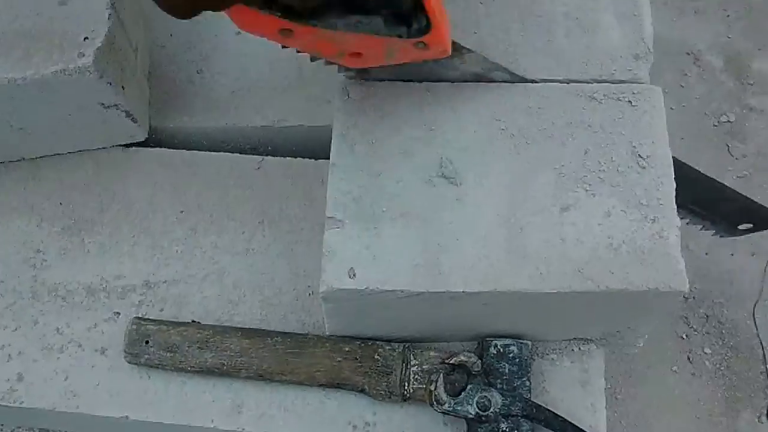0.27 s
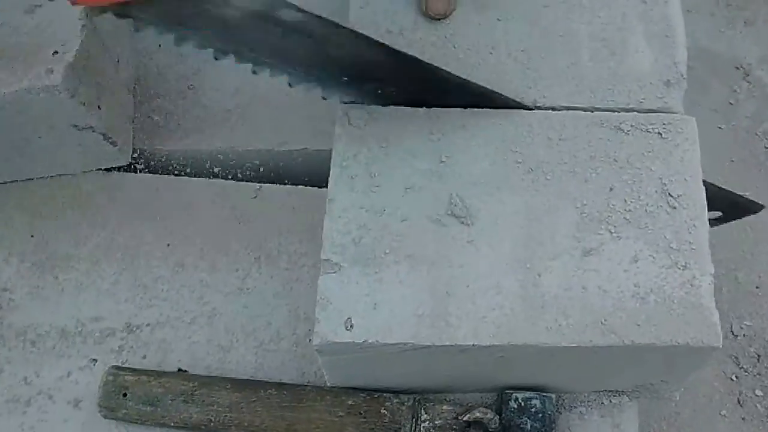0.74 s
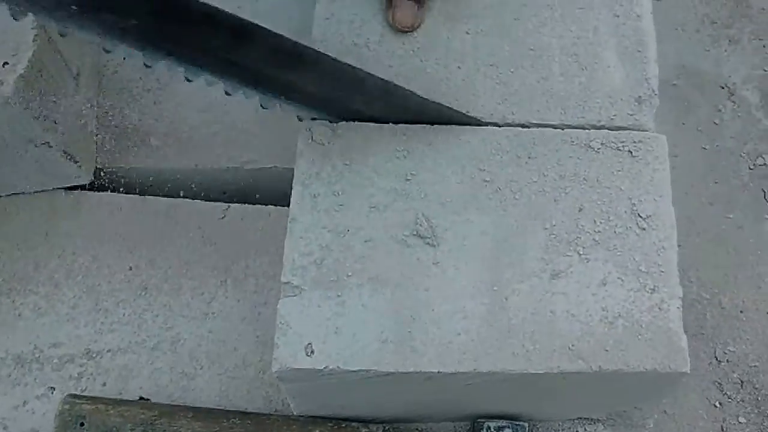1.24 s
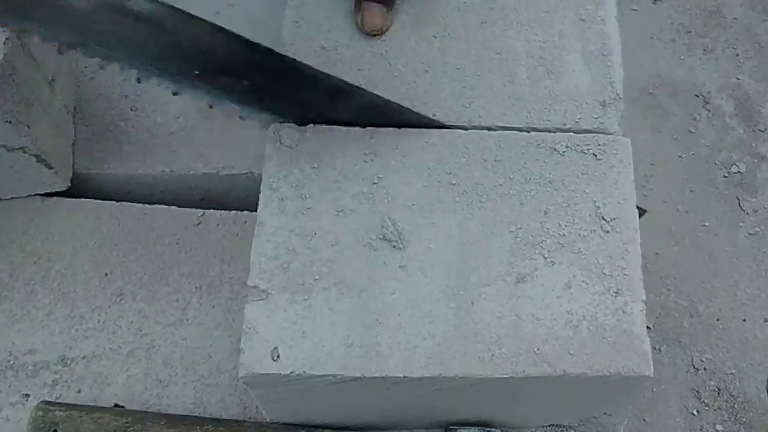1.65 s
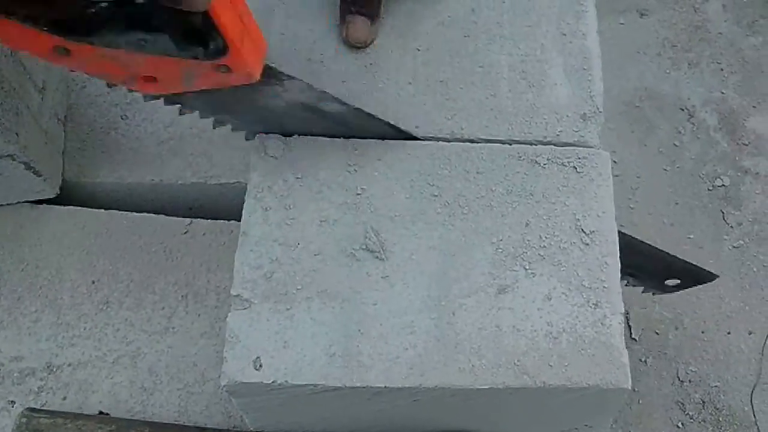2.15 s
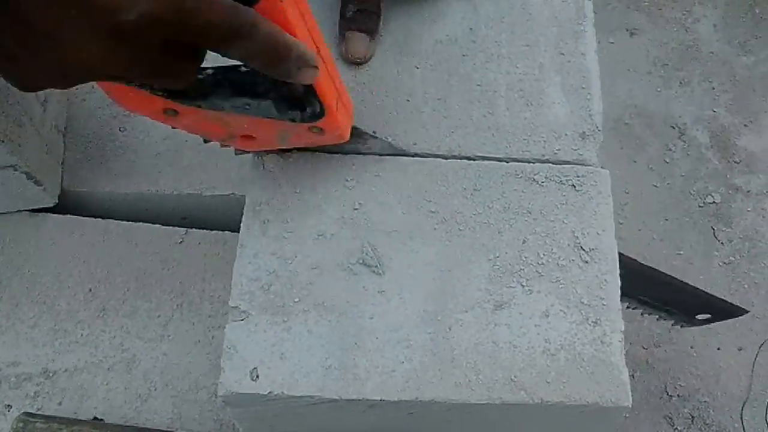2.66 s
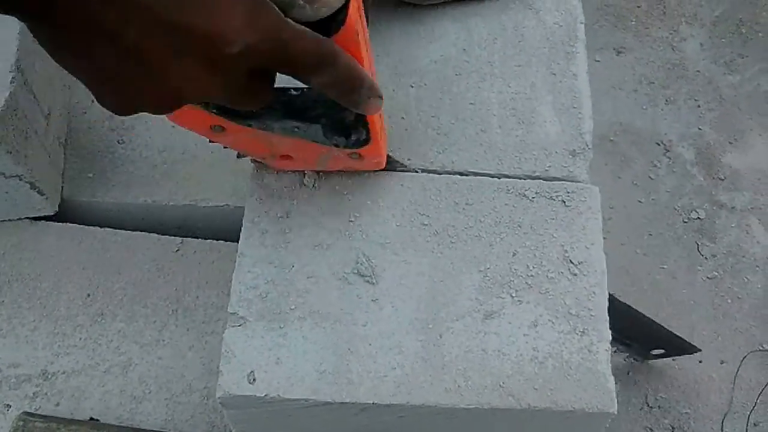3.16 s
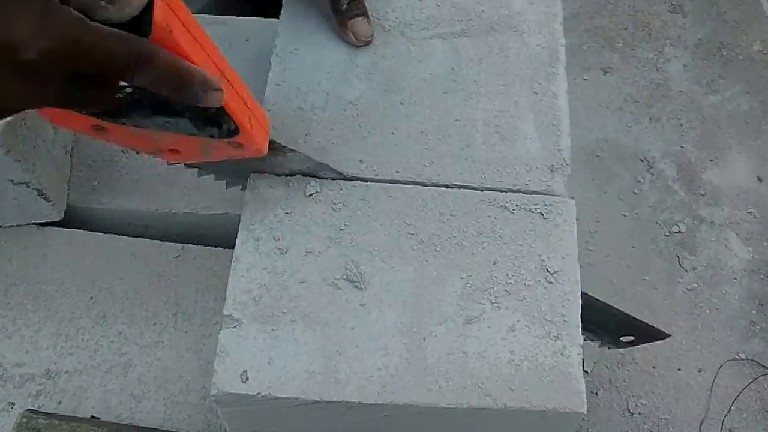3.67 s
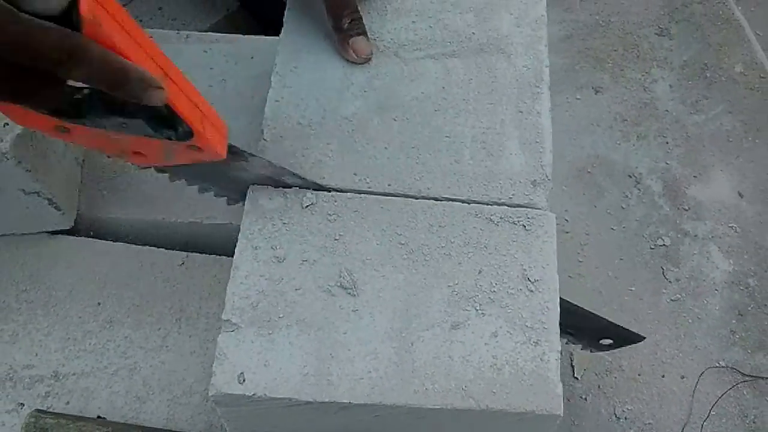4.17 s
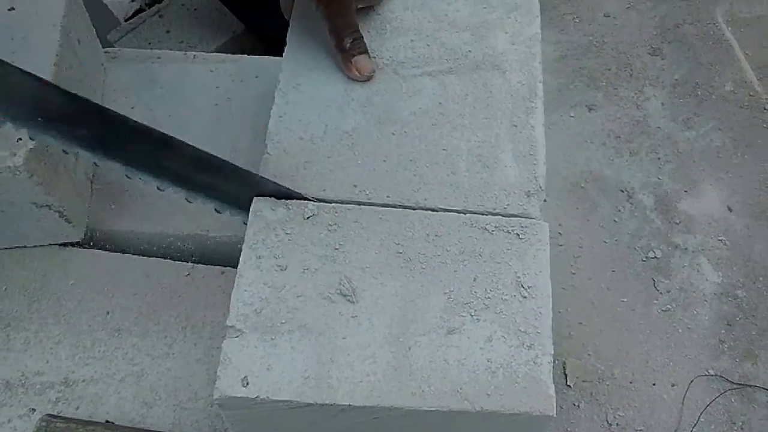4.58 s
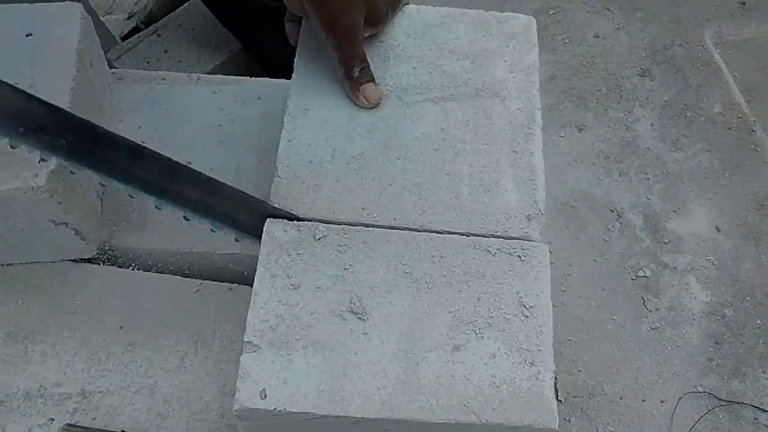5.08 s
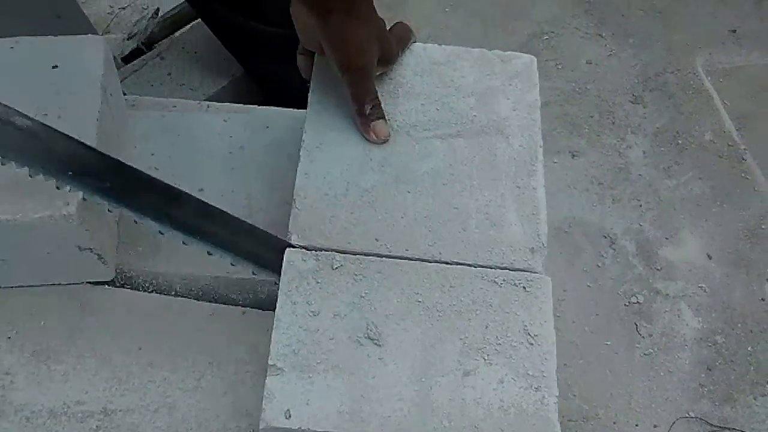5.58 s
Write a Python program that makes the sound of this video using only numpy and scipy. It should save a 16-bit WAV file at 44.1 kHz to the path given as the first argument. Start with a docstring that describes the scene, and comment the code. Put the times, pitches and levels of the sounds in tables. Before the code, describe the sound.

A coarse hand saw rasps back and forth through a lightweight concrete block in steady, rapid strokes, gritty and close, outdoors.

```python
"""Outdoors among stacked blocks, a coarse-toothed hand saw cuts aerated concrete close to the listener.
On each stroke the passing teeth gate a stream of random grains, which rasps and rings the steel near 5 kHz.
Pushes bite deep and drum the block; pulls are lighter and jerkier, with a loose blade humming early on.
Teeth catch in short swells, blows knock blade and handle, and the late strokes weaken. One soft thud
comes from the shifting block, over a quiet background of shaped noise. Both channels are the same."""
import sys
import numpy as np
from scipy import signal
from scipy.fft import rfft, irfft, next_fast_len
from scipy.io import wavfile
from scipy.ndimage import uniform_filter1d, map_coordinates

SR = 44100
rng = np.random.default_rng(int(sys.argv[2]) if len(sys.argv) > 2 else 0)


def wrap_up_sound(samples):
    """Save the sound to the file named by the first command line argument, as 16-bit audio."""
    columns = np.atleast_2d(samples).T
    # keep every value between -1 and 1, then stretch to whole-number steps
    tamed = np.clip(columns, -1, 1)
    steps = np.round(tamed * 32767).astype(np.int16)
    wavfile.write(sys.argv[1], SR, steps)


N = 257984
TIME = np.arange(N) / SR

# push strokes, swelling, held, then braking: start t/s, rasp level/dB, attack [share of stroke],
# sag [dB per stroke], braking point [0-1 of stroke], block level/dB re rasp
PUSH_STROKES = [(.208, -17.5, 0.43, 11, 0.7, -9), (.76, -18.5, 0.45, 13.5, 0.69, -8),
                (1.328, -19.5, 0.42, 15.5, 0.79, -8.5), (1.898, -18, 0.42, 15, .73, -9.5),
                (2.462, -19.5, .41, 9.5, 0.81, -8), (3.022, -18.5, 0.39, 14.5, 0.75, -9.5),
                (3.594, -21.5, 0.41, 13, .72, -8), (4.143, -20, 0.4, 3.5, 0.75, -10.5),
                (4.683, -21, 0.41, 5, 0.75, -9), (5.21, -21.6, 0.38, 7.5, 0.71, -8),
                (5.732, -22.5, 0.38, -2, .73, -9)]
# pull strokes, swelling, held, then easing as the blade's tip enters the cut: start t/s, rasp level/dB,
# attack [share of stroke], easing point [0-1 of stroke], block level/dB re rasp
PULL_STROKES = [(-.08, -19.5, 0.44, 0.66, -23), (.484, -21, 0.37, 0.65, -21), (1.04, -23, .33, 0.69, -20.5),
                (1.604, -21, 0.35, 0.63, -19.5), (2.182, -21.5, 0.37, 0.63, -20),
                (2.724, -21, 0.35, 0.64, -18), (3.315, -24.5, 0.27, 0.5, -28),
                (3.863, -24.5, 0.43, 0.59, -27), (4.41, -23, 0.26, .59, -22), (4.949, -25, 0.24, 0.58, -25),
                (5.475, -27.5, 0.32, 0.58, -24)]
# teeth catching on hard spots: centre t/s, extra level/dB, half length t/s
TOOTH_CATCHES = [(0.584, 4, 0.0054), (0.776, 3, .005), (1.64, 6.5, 0.0056), (1.843, 0.5, .006),
                 (2.281, 2, 0.0044), (2.296, 1, .003), (2.356, 4, .004), (2.84, 3.5, 0.0047),
                 (3.457, 5, .005), (3.684, 2.5, 0.007), (4.012, 5.5, .003), (4.375, 6.5, 0.0044)]
# colour of the crushing noise on a push: f/Hz, level/dB
PUSH_COLOUR = [(60, -55), (200, -13), (650, -16), (900, -8.5), (1300, -3.5), (2000, -3.5), (3200, -3.5),
               (4300, -1), (5600, -3), (7000, -15), (10000, -32), (16000, -39)]
# colour of the crushing noise on a pull: f/Hz, level/dB
PULL_COLOUR = [(60, -55), (200, -38), (600, -19.5), (950, -7), (1250, -7.5), (1900, -5.5), (3200, -4),
               (4200, -6.5), (5600, -4), (7000, -17), (10000, -25.5), (16000, -30.5)]
# colour of the finest dust: f/Hz, level/dB
DUST_COLOUR = [(3000, -33), (6000, 1), (8000, 2.5), (9300, 3), (10500, -1), (13000, -1.5), (16000, 0.5)]
# blade resonance as the saw goes in: depth [0-1], f/Hz, width f/Hz, level/dB
BLADE_RING = [(0, 5160, 395, -1), (.5, 4900, 557, -0.5), (1, 5180, 745, -6)]
# resonances of the block and its support: f/Hz, width f/Hz, level/dB
BLOCK_MODES = [(113, 12, -19), (188.6, 23, -3.5), (256, 55, -5.5), (324, 21, -1), (377, 23, 1),
               (445.3, 36, -0.5), (538, 88, -7), (698, 110, -6.5), (902, 160, -6), (1046, 47, -2.5),
               (1290, 240, -14)]
# the block's own notes: f/Hz, level/dB re the drumming
DRUM_NOTES = [(186, -17.5), (443, -10.5), (536, -13)]
# bending modes of the free blade on a pull: f/Hz, level/dB re rasp
BENDING_MODES = [(930, -20.5), (1040, -20.5), (1850, -23)]
# blade and handle knocking in the cut: t/s, level/dB, t60 t/s, steel ring level/dB re blow
KNOCK_BLOWS = [(0.509, -34, 0.037, -11), (1.147, -22, .015, -4), (1.913, -38, 0.044, 9),
               (2.2385, -24.5, .03, 2), (2.7257, -29.5, 0.04, -14), (2.7387, -21, 0.065, -21),
               (3.2388, -13, 0.023, -0.5), (3.292, -28, 0.055, -12), (3.3068, -23.5, 0.085, -16),
               (4.931, -38, 0.12, -14)]
# colour of the outdoor background: f/Hz, level/dB
AIR_COLOUR = [(25, -31), (60, -13.5), (115, 1), (190, 4.5), (400, 1.5), (700, -8.5), (1500, -17),
              (4000, -14), (8000, -29), (16000, -29)]

LAST_TURN = 5.94  # s, end of the final push, just past the end of the sound
TURN_GAIN = 0.062  # gain a push starts from; pulls add a share of it
PUSH_CURVE, BRAKE_DB_PER_STROKE = 1.66, 94  # slow start (exponent), fall at the end
PULL_CURVE, PULL_RELEASE_SHARE = 2.25, 0.17  # slow start (exponent), length of the stop in strokes
EASE_DB, EASE_SHARE = 5, 0.049  # drop as a pull eases, its length in strokes
# the tip snags just before a pull eases: extra dB, then lead and half length in strokes
SNAG_DB, SNAG_LEAD, SNAG_SHARE = 1.5, 0.054, 0.013
# chance unevenness of the cut: dB per unit of wobble, knots a second
PUSH_JERK_DB, PULL_JERK_DB, JERKS_PER_S = 0.55, 1.0, 72
# finest dust re rasp at the start, and its fading as the cut deepens
PUSH_DUST_DB, PULL_DUST_DB, DUST_FADE_DB_PER_S = -12.5, -18, 0.8
# drumming level at mid-stroke, exponent on the drive, growth over a stroke
DRUM_DB, DRUM_FOLLOW, DRUM_GROWTH_DB = -2.5, 0.58, 9.5
# strongest point and half length in strokes; a deeper cut damps the bending
BENDING_AT, BENDING_SHARE, BENDING_FADE_DB_PER_S = .33, 0.23, 1.04
TOP_HZ = 15800  # band limit of the recorder


def saw():
    """Strokes drive the crushing noise, the ringing blade, the dust and the drumming block."""
    progress, forward, drive, rasp_db, block_db = arm()
    pushing, drive = soften(forward), soften(drive)

    def by_stroke(on_push, on_pull):
        """Crossfade between the push and pull settings."""
        return pushing * on_push + (1 - pushing) * on_pull

    depth = (1 - (2 * forward - 1) * np.cos(np.pi * progress)) / 2
    speed = np.abs(np.sin(np.pi * progress ** by_stroke(.82, 1.03)))
    jerk_db = by_stroke(PUSH_JERK_DB, PULL_JERK_DB) * wobble(JERKS_PER_S)
    catch_db = sum(db * swell(s, half) for s, db, half in TOOTH_CATCHES)
    level = amp(soften(rasp_db) + jerk_db + catch_db) * drive
    force = bites(speed, teeth_per_s=400, scatter_db=3.0, t60=0.0098, steady=2.1)

    crumbs = crush(force, speed)
    walls = reverberant(crumbs, t60=0.055, wet_db=-4.5, renew_per_s=30)
    rasp = by_stroke(amp(-1) * coloured(walls, PUSH_COLOUR), amp(-3) * coloured(walls, PULL_COLOUR))
    ring = blade_ring(force, speed, depth) * amp(0.57 - 1.0 * pushing)

    # the dust thins a little faster than the rasp when the drive is weak
    dust_db = by_stroke(PUSH_DUST_DB, PULL_DUST_DB) - DUST_FADE_DB_PER_S * TIME
    dusty = reverberant(crumbs, t60=0.046, wet_db=-6, renew_per_s=21)
    dust = amp(dust_db) * drive ** 0.21 * coloured(dusty, DUST_COLOUR)

    drum_db = DRUM_DB + DRUM_GROWTH_DB * soften(progress - .5) + jerk_db
    heave = drive ** DRUM_FOLLOW * amp(drum_db)
    drum = soften(amp(rasp_db + block_db)) * heave * block(force, speed)
    return amp(-3) * (level * (rasp + ring + dust) + drum)


def arm():
    """Per sample: progress through the stroke 0-1, pushing 0 or 1, drive gain, rasp dB, block dB."""
    strokes = [(row, push) for row in PUSH_STROKES] + [(row, pull) for row in PULL_STROKES]
    strokes.sort(key=lambda stroke: stroke[0][0])
    ends = [row[0] for row, _ in strokes[1:]] + [LAST_TURN]
    motion = np.zeros((5, N))
    for (row, law), end in zip(strokes, ends):
        start, rasp_db, *shape, block_db = row
        now = (TIME >= start) & (TIME < end)
        progress = (TIME[now] - start) / (end - start)
        drive = law(progress, *shape)
        motion[:, now] = np.broadcast_arrays(progress, float(law is push), drive, rasp_db, block_db)
    return motion


def push(progress, attack, sag_db, brake):
    """Gain along a push: swell, a hold that sags as the arm stretches, brake."""
    past = lambda point: np.maximum(progress - point, 0)
    swelling = TURN_GAIN + (1 - TURN_GAIN) * rise(progress / attack) ** PUSH_CURVE
    return swelling * amp(-sag_db * past(attack) - BRAKE_DB_PER_STROKE * past(brake))


def pull(progress, attack, ease):
    """Gain along a pull: swell, hold, a snag, a lighter hold, stop."""
    snag_db = SNAG_DB * bell((progress - ease + SNAG_LEAD) / SNAG_SHARE)
    grip_db = snag_db - EASE_DB * rise((progress - ease) / EASE_SHARE)
    stopping = rise((1 - progress) / PULL_RELEASE_SHARE) ** 1.64
    moving = rise(progress / attack) ** PULL_CURVE * stopping
    return TURN_GAIN * (0.56 + 0.38 * progress) + moving * amp(grip_db)


def bites(speed, teeth_per_s, scatter_db, t60, steady):
    """Force on the cut, near rms 1: passing teeth break chips of chance size; a slow blade mostly rubs."""
    # the tooth rate follows speed + .15, with a little random timing
    count = np.cumsum(teeth_per_s * (speed + .15)) / SR + .4 * wobble(200)
    passing = np.diff(np.floor(np.maximum.accumulate(count)), prepend=0) > 0
    chips = passing * (0.24 + speed) * chance_size(scatter_db)
    decay = amp(-60 * TIME[:SR // 20] / t60)
    force = steady + unit(np.abs(signal.fftconvolve(chips, decay)[:N]))
    # level out the slow changes, so the strokes alone set the loudness
    return force / np.sqrt(np.abs(uniform_filter1d(force ** 2, size=700)) + 1e-6)


def grains(speed, per_s, scatter_db):
    """Pore walls snapping as random clicks, more of them when the blade is fast; rms 1."""
    chance = np.clip(per_s * (speed + .15) / SR, 1e-3, 1)
    size = chance_size(scatter_db) * rng.choice([-1, 1], N)
    return unit((rng.random(N) < chance) * size / np.sqrt(chance))


def crush(force, speed):
    """A fresh stream of fine grains pressed by the teeth."""
    return force * grains(speed, per_s=20000, scatter_db=3)


def blade_ring(force, speed, depth):
    """The steel's ring, lowest in pitch at half depth, broader and more damped as the cut grips the blade."""
    ring = np.zeros(N)
    for at, hz, width, db in BLADE_RING:
        share = np.sqrt(np.clip(1 - 2 * np.abs(depth - at), 0, 1))
        ring += share * amp(db) * resonant(crush(force, speed), [(hz, width, 0)])
    ring = reverberant(ring, t60=0.044, wet_db=2.0, renew_per_s=25)
    return filtered(ring, lambda f: 1 / (1 + (f / 6800) ** 8))


def block(force, speed):
    """Coarse chips excite the block's resonances, joined by its own unsteady notes."""
    body = resonant(force * grains(speed, per_s=4000, scatter_db=2), BLOCK_MODES)
    notes = sum(amp(db) * hum(hz, waver_per_s=24) for hz, db in DRUM_NOTES)
    return amp(0.04) * body + notes


def flexing():
    """Early in each pull the loose length of the blade hums unsteadily in its bending modes."""
    progress, forward, _, rasp_db, _ = arm()
    looseness = (1 - forward) * bell((progress - BENDING_AT) / BENDING_SHARE)
    loose = looseness * amp(rasp_db - BENDING_FADE_DB_PER_S * TIME)
    return soften(loose) * sum(amp(db) * hum(hz, waver_per_s=20 + hz / 7) for hz, db in BENDING_MODES)


def knocks():
    """Blade slaps the cut and handle meets the block: decaying noise blows, each with its share of steel ring."""
    clack = coloured(rng.standard_normal(N), PUSH_COLOUR)
    steel = resonant(rng.standard_normal(N), [(5300, 150, 0)])
    blows = np.zeros(N)
    for s, db, t60, ring_db in KNOCK_BLOWS:
        since = np.maximum(TIME - s, 0)
        attack = 1 - np.exp(-since / .0004)
        envelope = amp(db - 60 * np.minimum(since / t60, 3)) * attack
        blows += envelope * (amp(-2) * clack + amp(ring_db) * steel)
    return filtered(blows, lambda f: 1 - 1 / (1 + (f / 250) ** 4))  # low cut


def thud(s, db, length):
    """A soft low bump as the block shifts on its stack: a bell of low noise."""
    colour = [(30, -25), (55, -10), (80, -5), (110, -2), (160, -4), (400, -50), (2000, -90)]  # f/Hz, level/dB
    return amp(db) * swell(s, length) * coloured(rng.standard_normal(N), colour)


def background():
    """Quiet outdoor air: shaped noise whose level drifts slowly."""
    return amp(-49.5 + wobble(3.43)) * coloured(rng.standard_normal(N), AIR_COLOUR)


def amp(db):
    """Decibels to gain."""
    return 10 ** (np.asarray(db) / 20)


def unit(x):
    """Scale to rms 1."""
    return x / np.sqrt(np.mean(x ** 2) + 1e-20)


def soften(x):
    """Round off sudden steps with a moving average of 500 samples."""
    return uniform_filter1d(x, size=500)


def filtered(x, response):
    """x times a complex response of frequency."""
    m = next_fast_len(N + SR // 2)
    return irfft(rfft(x, m) * response(np.fft.rfftfreq(m, 1 / SR)), m)[:N]


def coloured(x, points):
    """x shaped by (f/Hz, level/dB) points on a log axis, at rms 1."""
    hz, db = np.transpose(points)
    return unit(filtered(x, lambda f: amp(np.interp(np.log(f + 1), np.log(hz), db))))


def resonant(x, modes):
    """x rung through (f/Hz, width f/Hz, level/dB) modes of alternating sign, at rms 1."""
    def response(f):
        total = 0
        for k, (centre, width, db) in enumerate(modes):
            damping = 1j * f * width
            total = total + (-1) ** k * amp(db) * damping / (centre * centre - f * f + damping)
        return total
    return unit(filtered(x, response))


def reverberant(x, t60, wet_db, renew_per_s):
    """x plus a dense ring of decaying noise, redrawn renew_per_s times a second and crossfaded."""
    t = TIME[:SR // 8]
    hop = int(SR / renew_per_s)
    window = np.sin(np.pi * np.arange(2 * hop) / (2 * hop))
    padded = np.pad(x, (hop, 2 * hop))
    wet = np.zeros(N + 3 * hop + len(t))
    for start in range(0, N + hop, hop):
        tail = rng.standard_normal(len(t)) * amp(-60 * t / t60)
        ring = signal.fftconvolve(padded[start:start + 2 * hop] * window, tail / np.linalg.norm(tail))
        wet[start:start + len(ring)] += ring
    return (x + amp(wet_db) * wet[hop:hop + N]) / np.hypot(1, amp(wet_db))


def wobble(rate):
    """A smooth random curve, rate knots a second."""
    return map_coordinates(rng.standard_normal(int(N * rate / SR) + 4), [TIME * rate])


def chance_size(scatter_db):
    """A random gain per sample, scattered in dB and held within two deviations."""
    return amp(scatter_db * np.clip(rng.standard_normal(N), -2, 2))


def hum(hz, waver_per_s):
    """An unsteady tone, a narrow band of noise around hz."""
    return sum(wobble(waver_per_s) * wave(2 * np.pi * hz * TIME) for wave in (np.cos, np.sin))


def swell(s, half):
    """A bell around time s."""
    return bell((TIME - s) / half)


def bell(offset):
    """A bell-shaped rise and fall, offset in half lengths from its top."""
    return np.exp(-np.minimum(offset ** 2, 20))


def rise(u):
    """A quarter sine from 0 to 1 as u goes from 0 to 1."""
    return np.sin(np.pi / 2 * np.clip(u, 0, 1))


def scene():
    """Saw and knocks among stacked blocks, over a quiet outdoor background."""
    work = reverberant(saw() + flexing() + knocks(), t60=0.055, wet_db=-16.5, renew_per_s=8)
    mono = work + thud(s=4.40, db=-50, length=.08) + background()
    return np.array([mono, mono])


def record(dry):
    """The recorder keeps nothing above its band limit."""
    return np.array([filtered(channel, lambda f: f < TOP_HZ) for channel in dry])


dry = scene()
out = record(dry)
wrap_up_sound(out)
```